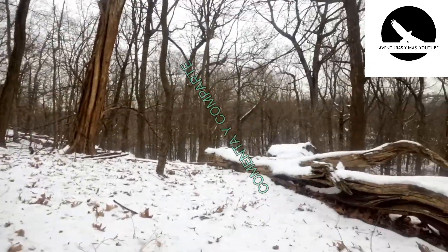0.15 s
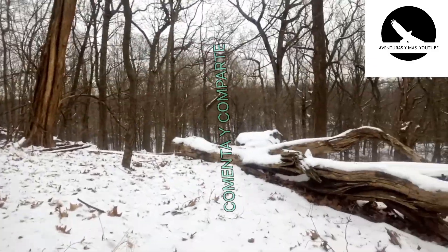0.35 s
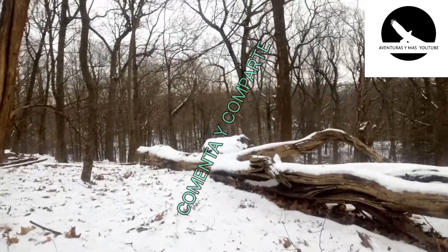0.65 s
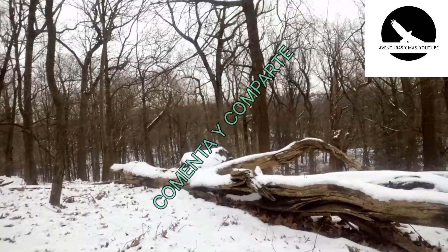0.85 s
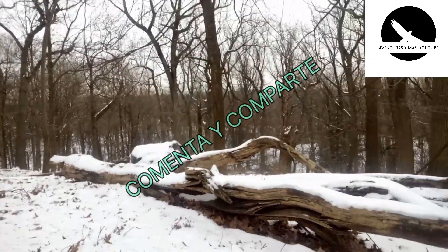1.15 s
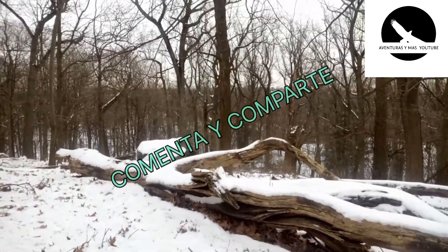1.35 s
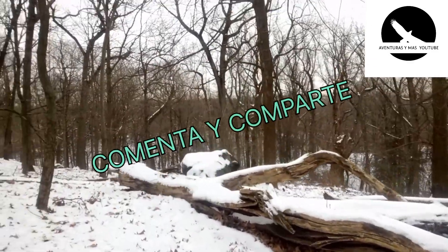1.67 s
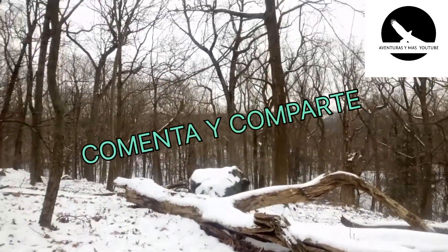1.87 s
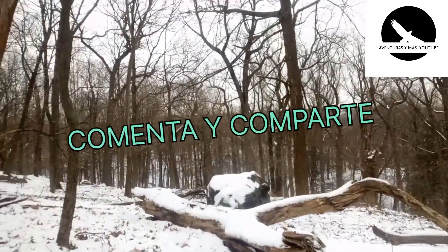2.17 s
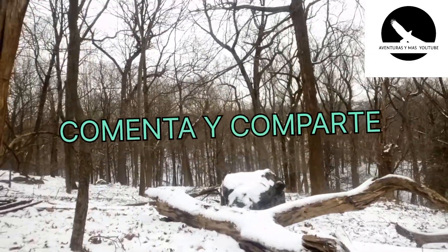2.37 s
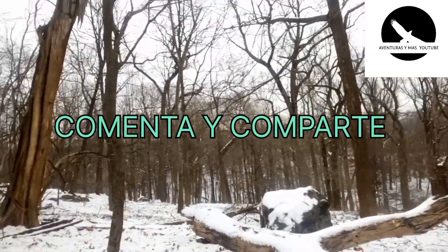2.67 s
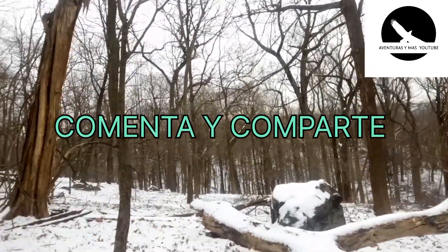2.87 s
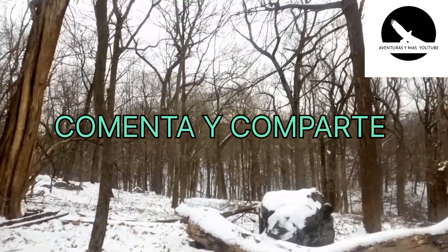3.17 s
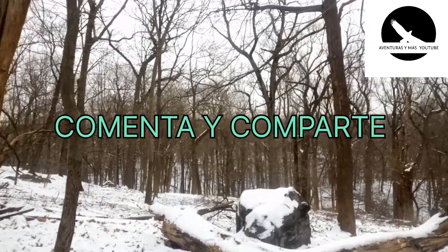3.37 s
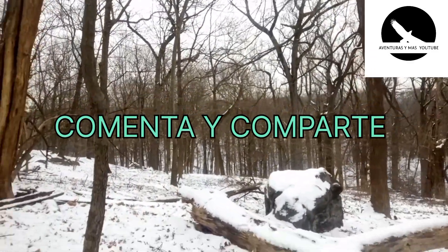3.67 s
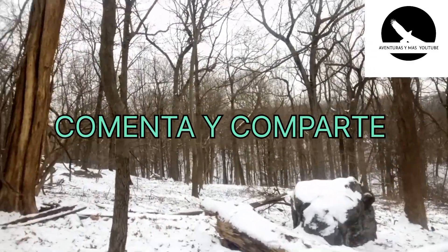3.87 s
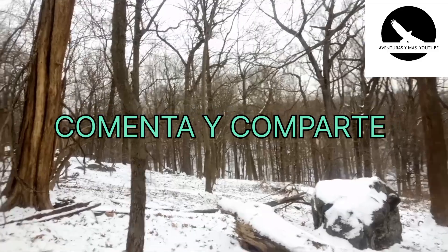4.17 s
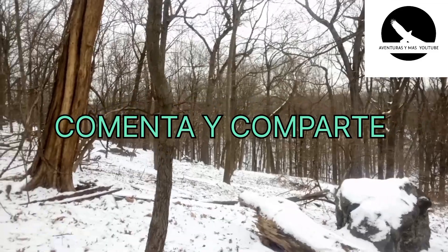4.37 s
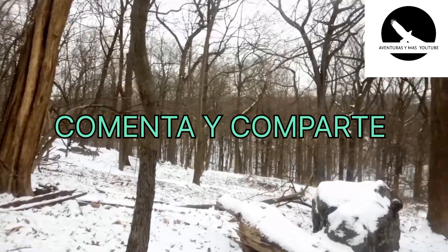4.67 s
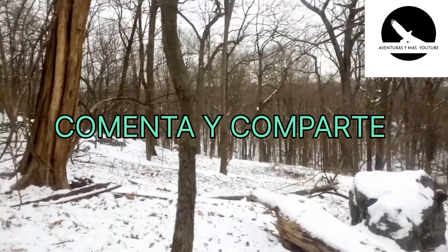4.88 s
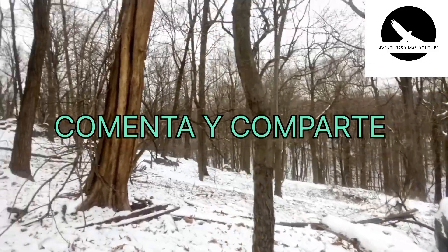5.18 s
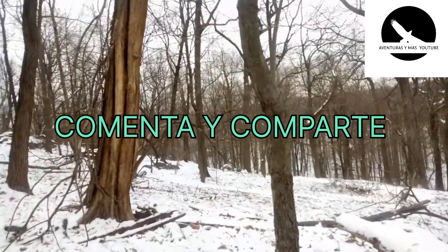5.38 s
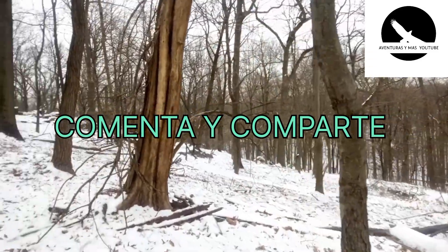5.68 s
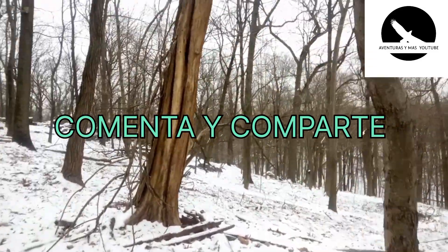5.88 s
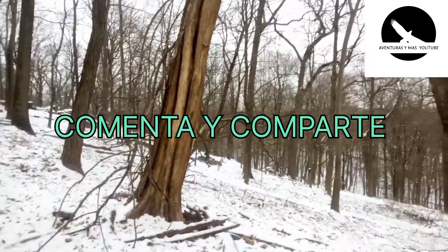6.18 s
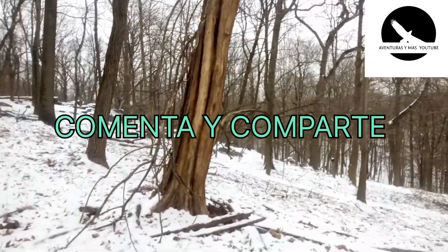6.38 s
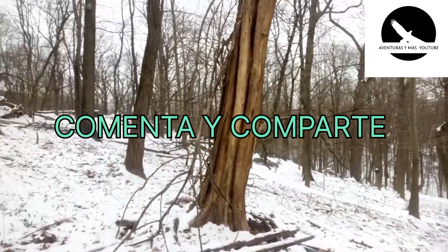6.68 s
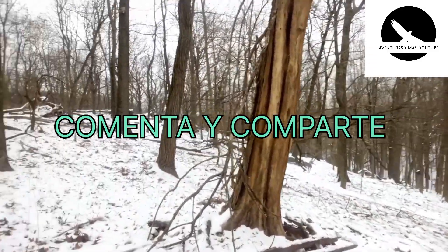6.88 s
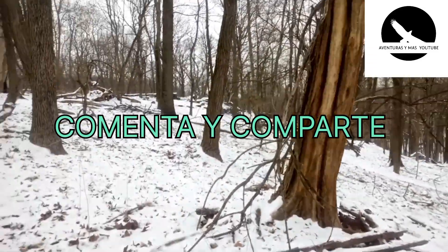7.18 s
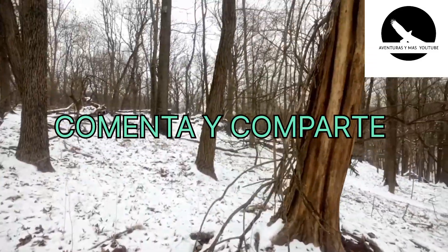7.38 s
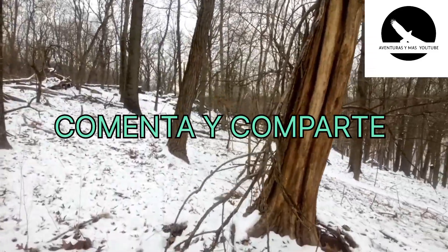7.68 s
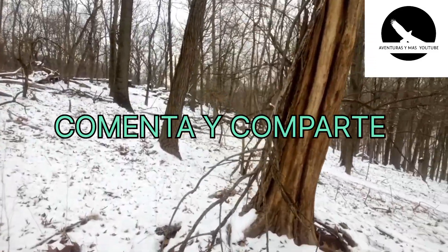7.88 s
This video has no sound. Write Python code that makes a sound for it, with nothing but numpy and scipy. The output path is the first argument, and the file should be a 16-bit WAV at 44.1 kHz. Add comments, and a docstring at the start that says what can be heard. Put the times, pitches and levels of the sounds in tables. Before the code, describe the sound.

Footsteps go at an even pace through crusted snow for about eight seconds, close to a hand-held microphone, roughly one step every 0.7 seconds. Each boot breaks the crust with a brittle crunch and packs the snow below, with light scuffs, small icy snaps and ticking crumbs in between. The first step lands right at the start. A low microphone bump at 0.5 seconds precedes a sharp crack and hollow thud near 0.8. Softer crunches follow around 1.7 and 2.5 seconds, each with a dull thud. From 3.1 seconds the walking grows firmer, with full crunches near 3.7, 4.4, 5.1, 5.8, 6.5 and 7.2 seconds, and a last step just before 8. The boot sinks through with a thud again around 3.1, 5.1 and 7.2. A few soft handling bumps occur, mostly in the first half. Behind everything lies the very faint hush of a winter forest.

```python
"""A quiet winter forest: someone walks at an even pace through crusted snow, a microphone in hand.
Each boot breaks the crust by brittle fracture, in avalanches of tiny cracks, and packs the snow below,
whose slips resonate in the hollow of the footprint. Single plates snap and ring, and icy crumbs drop
off the boots. Soft low bumps reach the microphone; behind all lies a hush with a few faint tones."""
import sys
import numpy as np
from scipy import signal
from scipy.fft import rfft, irfft, next_fast_len
from scipy.io import wavfile
from scipy.ndimage import uniform_filter1d

SR = 44100
rng = np.random.default_rng(int(sys.argv[2]) if len(sys.argv) > 2 else 0)


def store_wav(level_fs):
    """Save 16-bit WAV to argv[1]."""
    pcm = np.round(np.clip(np.atleast_2d(level_fs), -1, 1) * 32767)
    wavfile.write(sys.argv[1], SR, pcm.T.astype(np.int16))


N = 354652
TIME = np.arange(N) / SR
CLOCK = TIME[::32]   # coarse time grid for the pushes of the boots

# Footsteps: the heel lands, the foot rolls onto its sole, bears down and lets go.
# t/s, roll/s, bearing down/s, heel crunch/dB, sole crunch/dB, sole crunch fade/(dB/s),
# splinters re crunch/dB, heel packing/dB, sole packing/dB, sole packing fade/(dB/s),
# hollow's lower f/Hz, upper f/Hz, upper gain re lower/dB
FOOTSTEPS = [(0.005, 0.09, 0.075, -38.5, -39, 23.5, -6, -53.5, -63, 44, 194, 435, 0),
             (0.648, 0.15, 0.0097, -35.5, -25, 198.5, -5.5, -62, -32, 97.5, 187, 445, 10.5),
             (1.663, .036, 0.21, -42.5, -40, 161.5, -9.5, -43, -39.5, 200, 314, 760, 3),
             (2.444, 0.072, 0.073, -45.5, -43, 146.5, -12.5, -36.5, -39, 122, 318, 690, 5.5),
             (3.068, 0.085, 0.14, -41.5, -30, 132.5, -11, -38.5, -39.5, 73, 334, 740, -2),
             (3.688, 0.17, 0.097, -30, -32.5, 158.5, -12, -33, -48.5, 131.5, 433, 770, 1.5),
             (4.401, 0.051, .22, -29, -30, 89.5, -8.5, -35, -35.5, 201, 180, 747, 8.5),
             (5.057, 0.13, 0.13, -31.5, -32.5, 92, -11.5, -39.5, -41.5, 98, 342, 787, -1.5),
             (5.84, 0.05, 0.0069, -28, -32, 156, -7.5, -35, -36, 116, 322, 568, 10.5),
             (6.492, 0.1, .14, -39, -27.5, 47, -10, -39.5, -34, 50, 359, 715, 3),
             (7.218, 0.064, 0.17, -30.5, -28, 68, -8.5, -37.5, -36, 130, 376, 737, 2.5),
             (7.926, 0.083, .05, -27.5, -27.5, 7, -10, -33, -34, 30, 144, 796, -1)]
# A boot scuffs over the crust between footfalls: t/s, duration/s, crunch/dB, splinters re crunch/dB
BOOT_SCUFFS = [(0.53, 0.13, -52.5, -6), (0.877, 0.14, -40.5, -12), (1.085, 0.066, -50.5, -13.5),
               (1.259, 0.014, -56, -12), (1.409, 0.018, -61, -6), (1.514, 0.048, -54, -8.5),
               (2.267, 0.1, -69.5, -7), (2.936, 0.1, -61.5, -10), (3.469, 0.29, -59.5, -12),
               (4.259, 0.054, -57, -14.5), (4.304, 0.014, -50, -10.5), (4.661, 0.068, -44.5, -7.5),
               (4.735, .04, -56.5, -25), (4.849, 0.012, -61, -9.5), (4.973, 0.045, -53, -27),
               (5.582, 0.039, -67, -5.5), (5.675, .14, -50.5, -9.5), (5.941, 0.17, -37, -6.5),
               (6.153, 0.0085, -53, -1.5), (6.336, 0.21, -57, -18), (6.786, 0.017, -51.5, -1),
               (7.045, .15, -56, -6.5), (7.503, 0.029, -50.5, -17), (7.865, 0.06, -43, -9)]
# A boot drops through the crust with a hollow thud: t/s, packing level/dB
BOOT_THUDS = [(0.786, -29), (1.718, -33.5), (2.507, -30), (3.083, -37.5), (3.138, -30), (5.065, -28),
              (5.106, -31.5), (7.213, -28.5)]
# Plates of crust that snap: t/s, relative level/dB, f/Hz, crumbling time/s, splinters re snap/dB
PLATE_SNAPS = [(0.174, -22, 1220, 0.0023, -38), (0.303, -41, 1530, 0.0092, -3),
               (0.421, -48.5, 3000, 0.0091, -6), (0.537, -41, 2500, 0.0019, 4),
               (0.644, -19.5, 1320, 0.0036, 5.5), (0.788, -15.5, 1156, 0.0049, -20),
               (0.801, -13.5, 1710, 0.0047, -1.5), (0.872, -31.5, 1320, 0.0037, -28),
               (0.9, -29, 1430, .005, -29), (0.926, -37, 1520, 0.012, -30),
               (1.149, -45.5, 1590, 0.0084, -1), (1.275, -40.5, 1420, 0.005, -16),
               (1.497, -43.5, 2850, .01, -17), (1.548, -43, 2880, 0.0072, -20),
               (1.656, -36, 870, 0.0032, -23), (2.497, -32, 700, .005, -16),
               (2.725, -45.5, 1140, 0.0046, -31), (2.898, -44.5, 1260, 0.0064, -25),
               (3.263, -26.5, 1800, 0.0045, -35), (3.322, -43.5, 2300, 0.0039, -10),
               (3.391, -49.5, 1650, .005, -22), (3.487, -45.5, 1290, 0.0038, -6),
               (3.563, -35.5, 1760, 0.0053, -23), (3.677, -20.5, 800, 0.0044, -24),
               (3.703, -18.5, 1160, 0.0047, -29), (3.767, -19, 1180, 0.0032, -16),
               (4.254, -46.5, 2510, 0.0099, -29), (4.314, -43, 1460, 0.009, -35),
               (4.397, -25, 1450, .003, -18), (4.436, -23, 1780, 0.0058, -6),
               (4.586, -28, 1740, 0.0032, -29), (4.703, -35, 2430, 0.0042, -1),
               (4.858, -36, 1840, 0.0062, -13.5), (5.003, -46, 2100, 0.0023, -24),
               (5.023, -38.5, 2150, 0.0014, -24), (5.055, -35, 1230, 0.07, -21),
               (5.145, -31, 1280, .003, -9.5), (5.664, -39.5, 2800, 0.0058, -30),
               (5.836, -28, 2930, 0.044, -14), (5.875, -19.5, 1490, 0.0033, -8),
               (5.974, -25.5, 1270, 0.0039, -19), (6.315, -53.5, 4430, 0.0044, -8),
               (6.595, -27, 2090, .004, -6), (6.944, -58, 3040, 0.0046, -1),
               (7.115, -35, 1600, 0.0052, -42), (7.169, -32.5, 2620, 0.0038, -27),
               (7.213, -31, 525, 0.013, -28), (7.441, -30, 2600, .003, -17),
               (7.864, -32.5, 2980, 0.0047, -3.5), (7.922, -27.5, 683, 0.019, -4),
               (8.004, -26, 2360, 0.0052, -22)]
# Low bumps on the microphone: t/s, relative peak level/dB, duration/s
MIC_BUMPS = [(.005, -45.5, 0.048), (0.29, -52.5, .05), (0.516, -26, 0.034), (0.553, -39, 0.036),
             (0.616, -39.5, 0.046), (0.859, -39, .015), (1.038, -50.5, 0.13), (1.519, -48, 0.12),
             (1.74, -49.5, 0.13), (2.034, -38, 0.031), (2.316, -47, 0.025), (2.374, -41, 0.14),
             (2.961, -52.5, .035), (3.724, -42, 0.03), (3.853, -47, 0.025), (4.416, -42.5, 0.015),
             (7.943, -44, .027)]
# Faint far tones: t/s, level/dB, f/Hz, duration/s
DISTANT_TONES = [(7.028, -61.5, 721, 0.12), (7.578, -57, 515, 0.059), (7.732, -59, 411, 0.069)]
# Spectral weighting of the breaking crust: f/Hz, gain/dB
CRUNCH_SPECTRUM = [(680, -24.5), (850, -6), (1000, -6.5), (1280, 3.5), (1700, 2.5), (2150, 0.5),
                   (2800, 1.5), (3450, -3.5), (4000, -16.5), (4600, -20.5)]
# Spectral weighting of the ice splinters: f/Hz, gain/dB
SPLINTER_SPECTRUM = [(2800, -25), (3600, -2.5), (4300, 1.5), (5000, -0.5), (6000, -5), (7000, -8.5),
                     (7700, -18.5), (8400, -36.5)]
# Spectral weighting of the snow being packed: f/Hz, gain/dB
PACKING_SPECTRUM = [(50, -38.5), (90, -12.5), (150, -8.5), (230, 0.5), (340, -0.5), (520, -5), (750, -2.5),
                    (950, 3.5), (1300, 2), (2500, -50.5)]
# Spectral weighting of the distant air: f/Hz, gain/dB
HUSH_SPECTRUM = [(20, -14.5), (40, -4), (75, 8.5), (120, -2), (200, -1.5), (300, -3.5), (480, -3),
                 (740, -4.5), (1000, -11), (1500, -16.5), (2100, -22), (3000, -25.5), (5000, -28.5),
                 (7200, -35.5), (8300, -48)]
# Spectral weightings of the crumbs and of the microphone's rumble: f/Hz, gain/dB
CRUMB_SPECTRUM = [(1100, -2), (1500, 1.5), (3000, 11.5), (6000, -1.5), (7600, -22.5)]
RUMBLE_SPECTRUM = [(45, -13.5), (65, 9), (95, 2), (125, 1), (160, -11), (230, -24.5), (400, -44)]

HEEL_RISE_DB_PER_S, SOLE_RISE_DB_PER_S = 1696.5, 237
HEEL_FADE_DB_PER_S = 39.5   # the crust under the heel is used up
# the low crunch of packed snow swells more gently and fades faster under the heel,
# and swells more sharply under the sole
PACK_HEEL_RISE_DB_PER_S, PACK_SOLE_RISE_DB_PER_S, PACK_HEEL_FADE_DB_PER_S = 1007, 396.5, 73
RELEASE_DB_PER_S, LIFT_DB_PER_S2 = 110.5, 2598   # the foot leaves the snow faster and faster
SCUFF_CATCH_DB, SCUFF_CATCHES_PER_S = 2.5, 60   # the dragged sole catches and slips
SCUFF_PACKING_DB = -17.5   # a scuff carries little weight


def crust(crunch, splinter, avalanche):
    """Brittle fracture: the harder the crust is crushed, the more bonds tick and fragments ring."""
    per_s = 1500 + 18000 * np.sqrt(crunch / crunch.max())
    ticks = evened(fractures(per_s, spread_db=4.0), 0.07)
    rings = fragments(fractures(per_s, spread_db=2.0), 850, 7316, q=16, wander_db=2.5, count=72)
    grains = (1.2 * ticks + evened(rings, 0.18)) * avalanche
    grains = reflected(grains, strength=0.096, lag_scale_s=0.004)
    body = from_db(-0.18) * crunch * evened(coloured(grains, CRUNCH_SPECTRUM), 0.18)
    return body + splinter * evened(coloured(grains, SPLINTER_SPECTRUM), 0.053)


def packing(weight, avalanche, relative_width=0.36, lead_s=0.061):
    """Cavity resonance: snow yields in small slips that excite two modes of each footprint's hollow."""
    clicks = fractures(2600, spread_db=3.5)
    slips = fragments(clicks, 110, 1129, q=7.5, wander_db=3.5, count=20) * avalanche
    footprint = np.searchsorted(np.array(FOOTSTEPS)[1:, 0] - lead_s, TIME)
    out = np.zeros(N)
    for k, (*_, low_hz, high_hz, high_db) in enumerate(FOOTSTEPS):
        own_slips = slips * (footprint == k) + 1e-18
        # above its upper resonance the hollow muffles the slips
        muffling = signal.butter(3, 1.35 * high_hz, fs=SR, output="sos")
        out += 0.6 * signal.sosfilt(muffling, own_slips)
        out += resonance(own_slips, low_hz, relative_width * low_hz)
        out -= from_db(high_db) * resonance(own_slips, high_hz, relative_width * high_hz / 2)
    return from_db(0.27) * weight * evened(coloured(out, PACKING_SPECTRUM), 0.037)


def gait():
    """Incoherent addition: pushes sum in power to give crunch, splinter and packing amplitudes."""
    crunch, splinter, weight = np.zeros((3, len(CLOCK)))
    for (s, roll_s, bear_s, heel_db, sole_db, fade, ice_db,
         heel_pack_db, sole_pack_db, pack_fade, *_) in FOOTSTEPS:
        step = push(s, roll_s, heel_db, HEEL_RISE_DB_PER_S, HEEL_FADE_DB_PER_S)
        step += push(s + roll_s, bear_s, sole_db, SOLE_RISE_DB_PER_S, fade)
        crunch += step
        splinter += step * from_db(ice_db) ** 2
        weight += push(s, roll_s, heel_pack_db, PACK_HEEL_RISE_DB_PER_S, PACK_HEEL_FADE_DB_PER_S)
        weight += push(s + roll_s, bear_s, sole_pack_db, PACK_SOLE_RISE_DB_PER_S, pack_fade)
    catching = np.interp(CLOCK, TIME, from_db(SCUFF_CATCH_DB * drift(SCUFF_CATCHES_PER_S))) ** 2
    for s, length_s, db, ice_db in BOOT_SCUFFS:
        scuff = catching * push(s, length_s, db, rise_db_per_s=1100, fade_db_per_s=52)
        crunch += scuff
        splinter += scuff * from_db(ice_db) ** 2
        weight += scuff * from_db(SCUFF_PACKING_DB) ** 2
    for s, db in BOOT_THUDS:
        weight += push(s, hold_s=0.024, db=db, rise_db_per_s=HEEL_RISE_DB_PER_S, fade_db_per_s=506)
    return [np.interp(TIME, CLOCK, np.sqrt(power)) for power in (crunch, splinter, weight)]


def push(peak_s, hold_s, db, rise_db_per_s, fade_db_per_s):
    """Exponential growth and decay: the power of one push swells, fades while held, then is let go."""
    age = CLOCK - peak_s
    lifting = np.maximum(age - hold_s, 0)
    lost_db = np.maximum(-rise_db_per_s * age, fade_db_per_s * age)
    lost_db += RELEASE_DB_PER_S * lifting + LIFT_DB_PER_S2 * lifting ** 2
    return from_db(db - np.clip(lost_db, 0, 100)) ** 2


def fractures(per_s, spread_db):
    """Poisson process: independent breaks give clicks, many small and a few large."""
    sizes = from_db(spread_db * np.minimum(rng.exponential(1, N), 5)) * rng.choice([-1, 1], N)
    return sizes * (rng.random(N) < per_s / SR)


def fragments(clicks, low_hz, high_hz, q, wander_db, count):
    """Free vibration: each click rings a fragment of one of many sizes for a few cycles."""
    out, size_class = 0, rng.integers(0, count, N)
    for k, hz in enumerate(np.geomspace(low_hz, high_hz, count)):
        if k % 4 == 0:
            favour = from_db(wander_db * drift(14))   # neighbouring sizes come and go together
        out = out + resonance(clicks * (size_class == k), hz, hz / q) * favour
    return rms_one(out)


def avalanches(per_s, decay_s, depth):
    """Chain reaction: one break sets off its neighbours, so the power jumps and then dies away."""
    surge = lingering(np.abs(fractures(per_s, spread_db=5.0)) + 1e-18, decay_s)
    return np.sqrt(1 + depth * surge / surge.mean())


def reflected(x, strength, lag_scale_s, count=3):
    """Comb filtering: short echoes off moving boots and legs interfere with the direct sound."""
    echoes = 0
    for lag_s in rng.uniform(0.15, 1, count) * lag_scale_s:
        emitted_s = TIME - lag_s * from_db(2 * drift(7))
        echoes = echoes + x[np.maximum((emitted_s * SR).astype(int), 0)]
    return x + strength * echoes


def snaps(ring_width_hz=150, ring_gain=2.0, crack_gain=3.5, level_db=-3.0):
    """Impulse excitation: a plate cracks and crumbles; its pieces ring near one pitch and splinter."""
    t, out = TIME[:SR // 8], np.zeros(N + SR)
    crack_band = signal.butter(2, [1150, 3500], "band", fs=SR, output="sos")
    splinter_band = signal.butter(2, [4000, 6600], "band", fs=SR, output="sos")
    snow_damping = signal.butter(4, 6800, fs=SR, output="sos")
    for s, db, hz, crumble_s, splinter_db in PLATE_SNAPS:
        age = t / crumble_s
        crack = crack_gain * (t == 0) * 0.005 / crumble_s   # slow breaks start softly
        force = crack + rng.standard_normal(len(t)) * (np.exp(-age) - np.exp(-6 * age))
        plate = resonance(resonance(force, hz, ring_width_hz), hz, hz)
        snap = rms_one(signal.sosfilt(crack_band, force)) + ring_gain * rms_one(plate)
        snap = rms_one(snap) + from_db(splinter_db) * rms_one(signal.sosfilt(splinter_band, force))
        # the energy is the opening power kept up for half the crumbling time
        gain = from_db(db + level_db) * np.sqrt(crumble_s / 2 / t[-1])
        start = int(s * SR)
        out[start:start + len(t)] += gain * rms_one(snap)
    return signal.sosfilt(snow_damping, out[:N] + 1e-18)


def crumbs(crunch, level_db=-67.5, follow_exponent=0.39):
    """Granular impacts: icy crumbs drop off the moving boots in clusters of dry ticks."""
    clusters = lingering(np.abs(fractures(65, spread_db=3.5)) + 1e-18, decay_s=0.0022)
    ticks = coloured(clusters * fractures(11000, spread_db=1.5), CRUMB_SPECTRUM)
    stirred = lingering(crunch, decay_s=0.059) ** follow_exponent
    return from_db(level_db) * rms_one(ticks * stirred)


def bumps(level_db=-1.0):
    """Amplitude modulation: low rumble swells briefly on the hand-held microphone."""
    swell = np.zeros(N)
    for s, peak_db, length_s in MIC_BUMPS:
        age = np.maximum(TIME - s, 0) / (length_s / 2)
        swell += from_db(peak_db) * (age * np.exp(1 - age)) ** 2
    rumble = coloured(rng.standard_normal(N), RUMBLE_SPECTRUM)
    low_cut = signal.butter(2, 45, "high", fs=SR, output="sos")
    return from_db(level_db) * signal.sosfilt(low_cut, swell * evened(rumble, 0.0086))


def forest(hush_db=-60.0):
    """Ambient noise: a faint hush of distant air, with soft tones that waver by frequency modulation."""
    air = rms_one(coloured(rng.standard_normal(N), HUSH_SPECTRUM))
    out = from_db(hush_db) * air * from_db(1.8 * drift(5.9))
    for s, db, hz, length_s in DISTANT_TONES:
        phase = 2 * np.pi * np.cumsum(hz * (1 + 0.023 * drift(100))) / SR
        swell = np.exp(-(2 * (TIME - s) / length_s) ** 2)
        out += from_db(db) * swell * np.sqrt(2) * np.sin(phase)
    return out


def resonance(x, hz, width_hz):
    """Damped oscillator: two poles, with unit gain at the peak."""
    r = np.exp(-np.pi * width_hz / SR)
    feedback = [1, -2 * r * np.cos(2 * np.pi * hz / SR), r * r]
    return signal.lfilter(np.array([1, 0, -1]) * (1 - r * r) / 2, feedback, x + 1e-18)


def coloured(x, spectrum):
    """Minimum-phase filtering through (f/Hz, gain/dB) points, falling 30 dB an octave beyond the ends."""
    size = 2 * next_fast_len(N // 2 + SR // 4)
    octave = np.log2(np.maximum(np.arange(size // 2 + 1) * SR / size, 1))
    hz, db = np.transpose(spectrum)
    outside = np.abs(octave - np.clip(octave, np.log2(hz[0]), np.log2(hz[-1])))
    gain = from_db(np.interp(octave, np.log2(hz), db) - np.minimum(30 * outside, 60))
    cepstrum = irfft(np.log(gain))[:size // 2]
    response = np.exp(rfft(2 * cepstrum, size) - cepstrum[0])
    return irfft(rfft(x, size) * response, size)[:N]


def lingering(x, decay_s):
    """Leaky integration: every input leaves an exponential tail."""
    return signal.lfilter([1], [1, -np.exp(-1 / (decay_s * SR))], x)


def drift(per_s):
    """Random modulation: straight lines between Gaussian values, at unit power."""
    knots = rng.standard_normal(int(per_s * N / SR) + 2)
    return rms_one(np.interp(TIME * per_s, np.arange(len(knots)), knots))


def evened(x, window_s):
    """Running normalisation: near unit power over each window; the finer grain stays."""
    size = max(int(window_s * SR / 2), 8)
    power = uniform_filter1d(uniform_filter1d(x ** 2, size), size)
    return x / np.sqrt(np.abs(power) + 1e-12)


def rms_one(x):
    """Normalisation to unit power."""
    return x / np.sqrt(np.mean(x ** 2) + 1e-20)


def from_db(db):
    """Amplitude ratio of a level in decibels."""
    return 10 ** (np.asarray(db) / 20)


def scene():
    """Superposition: crust and snow give way in shared bursts, over the hush of the forest."""
    crunch, splinter, weight = gait()
    avalanche = avalanches(per_s=190, decay_s=0.0035, depth=0.45)
    boots = crust(crunch, splinter, avalanche) + packing(weight, avalanche) + snaps() + crumbs(crunch)
    return (boots + bumps() + forest())[None]


def record(dry, cutoff_hz=8000):
    """Band limiting: the recorder's steep low-pass filter cuts off the top."""
    return signal.sosfilt(signal.ellip(10, 0.2, 80, cutoff_hz, fs=SR, output="sos"), dry)


dry = scene()
out = record(dry)
store_wav(out)
```